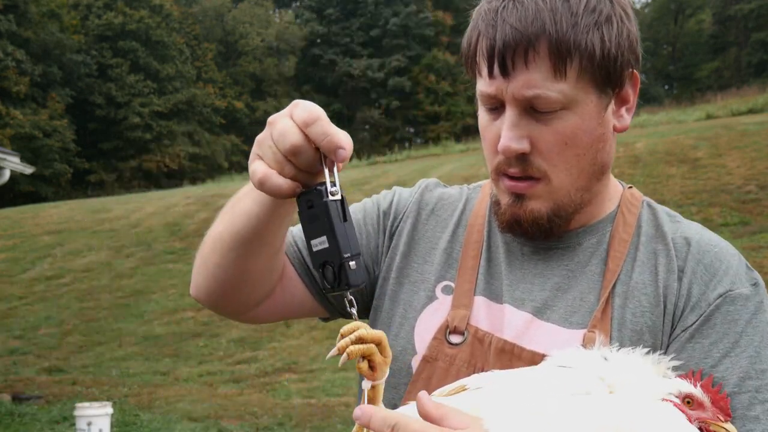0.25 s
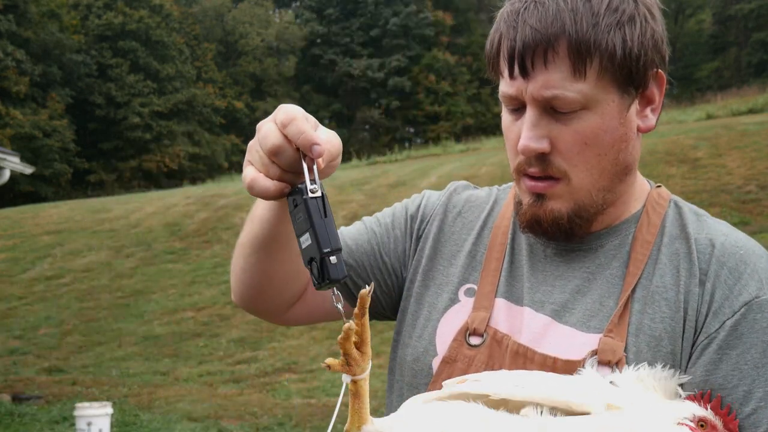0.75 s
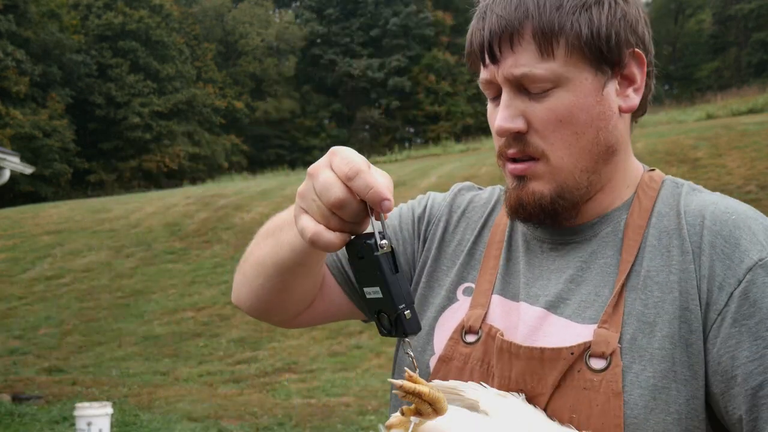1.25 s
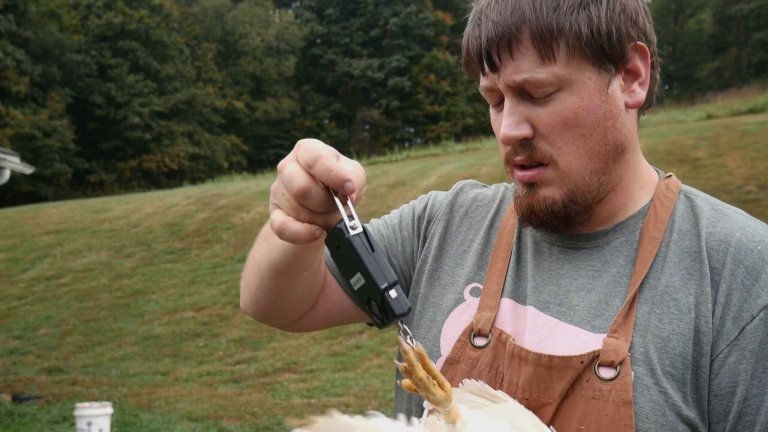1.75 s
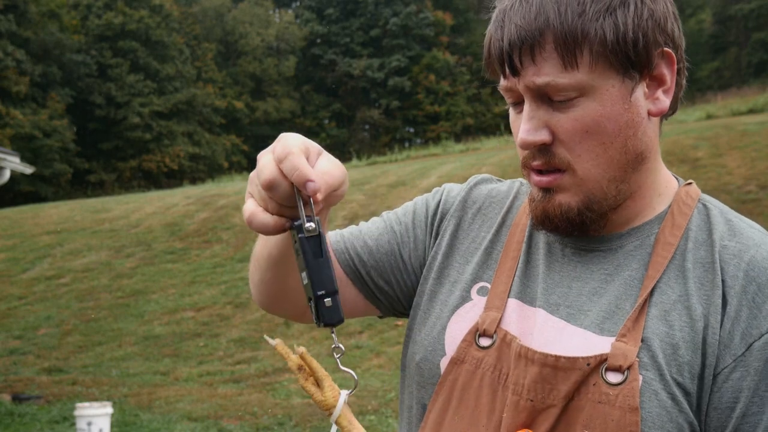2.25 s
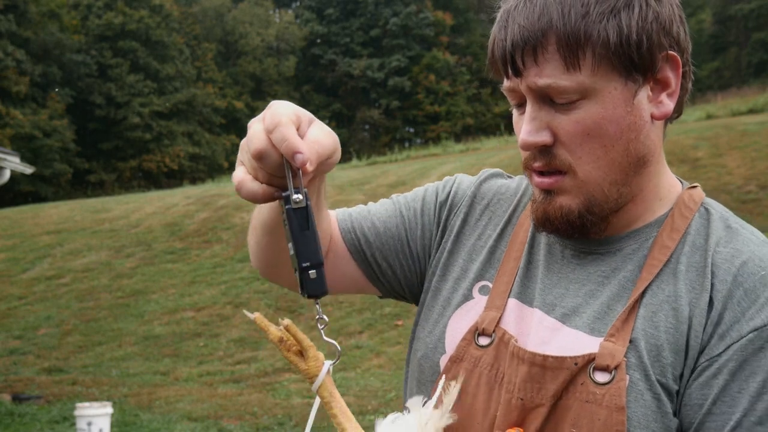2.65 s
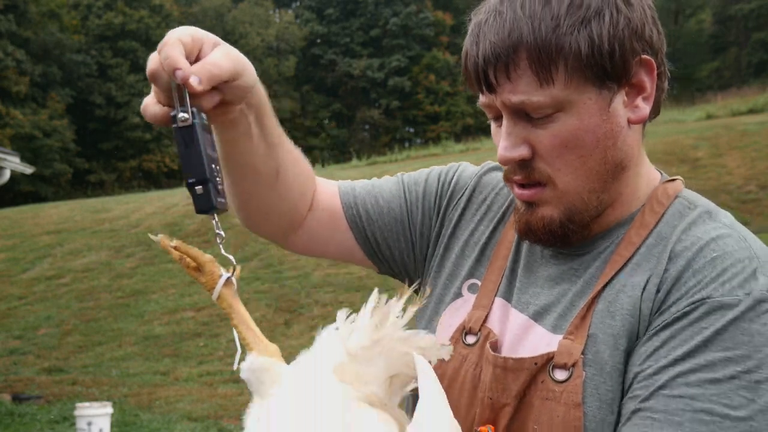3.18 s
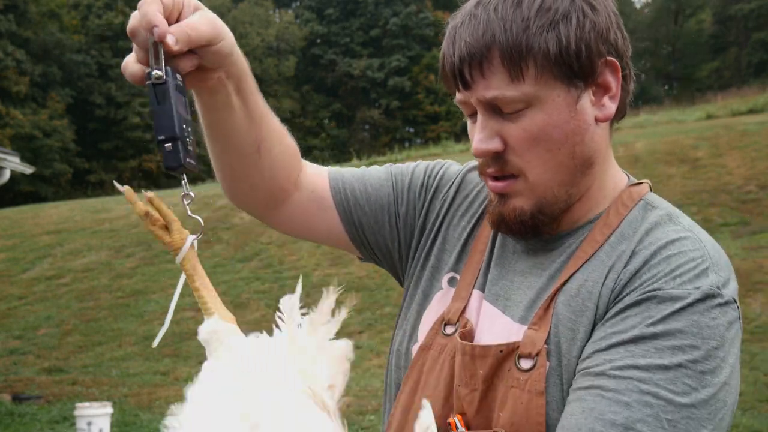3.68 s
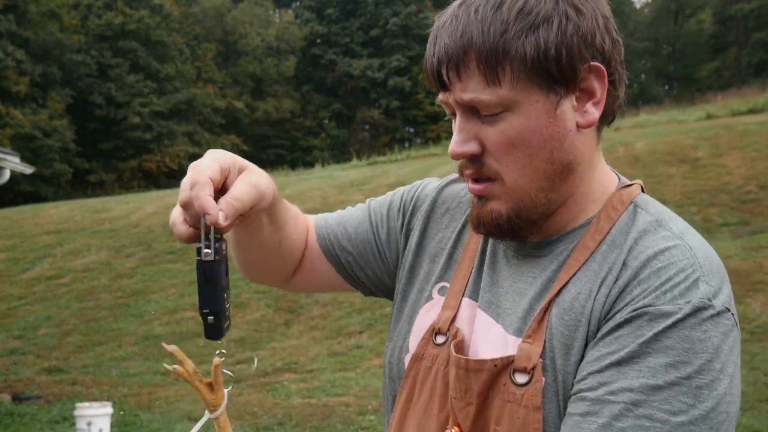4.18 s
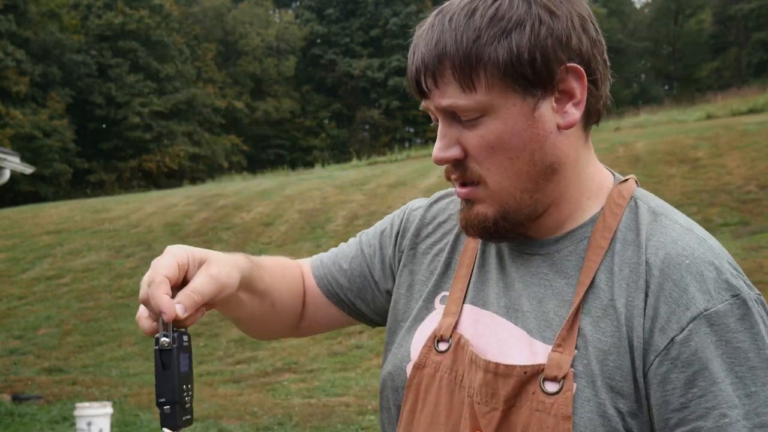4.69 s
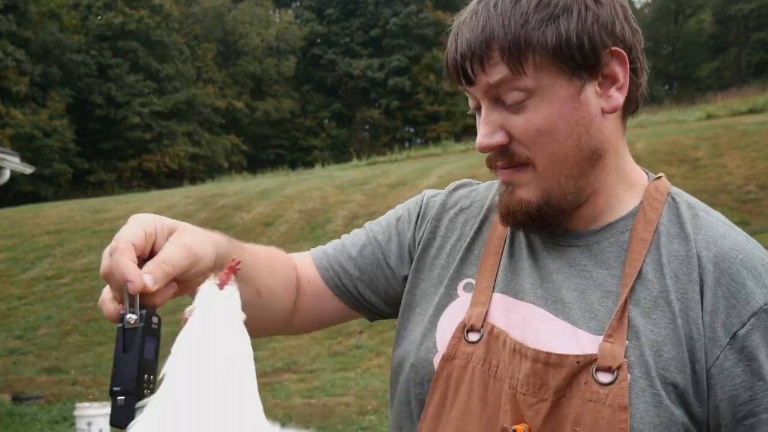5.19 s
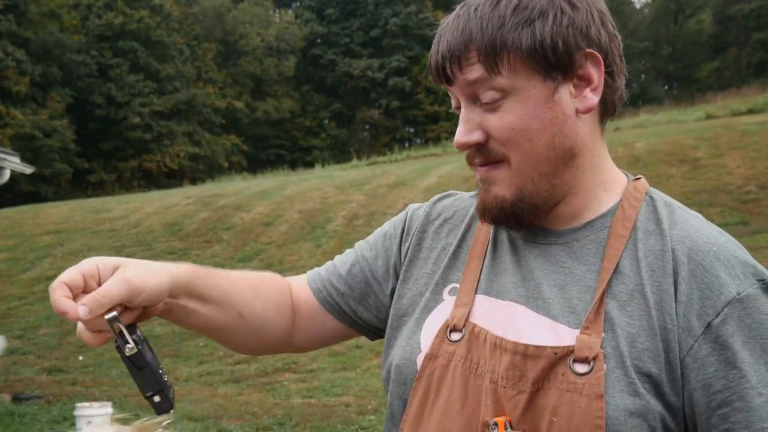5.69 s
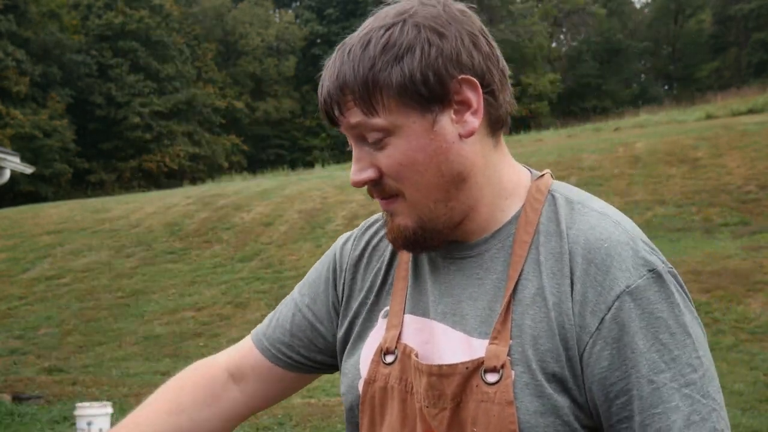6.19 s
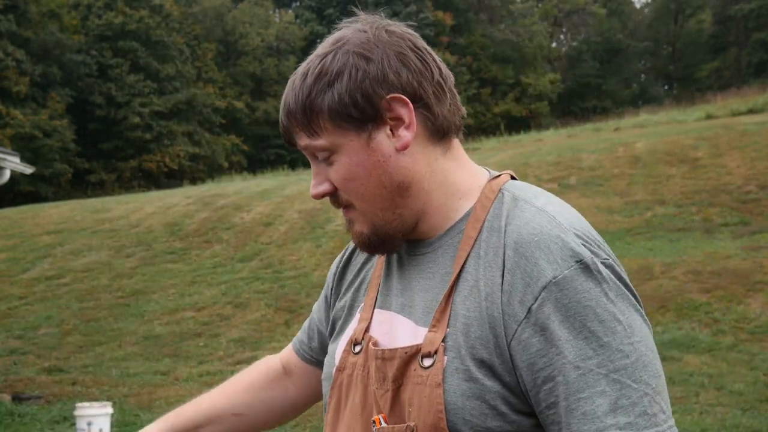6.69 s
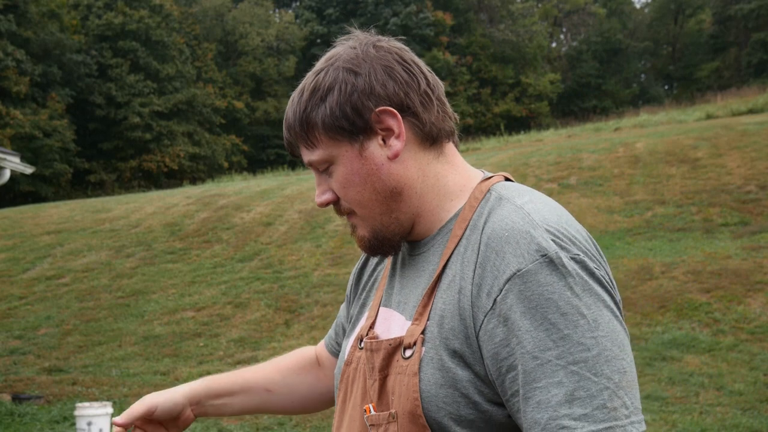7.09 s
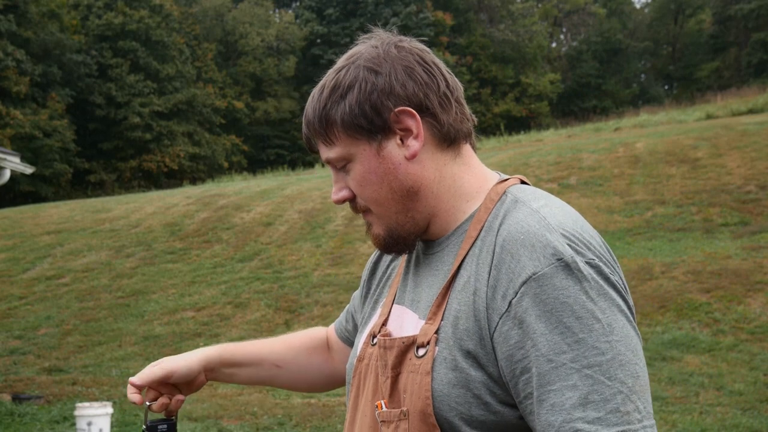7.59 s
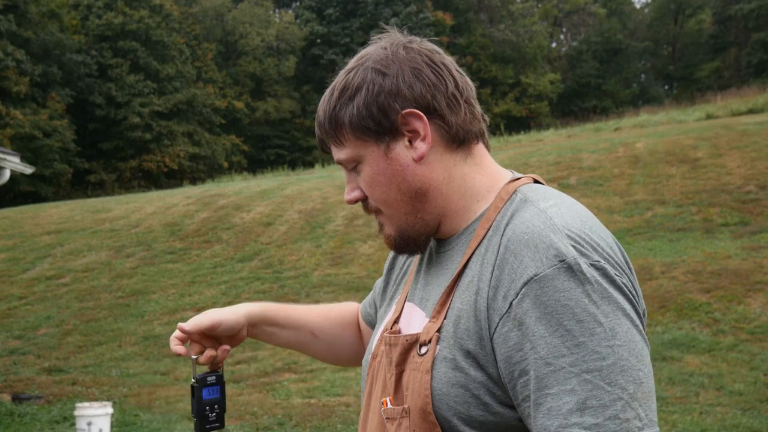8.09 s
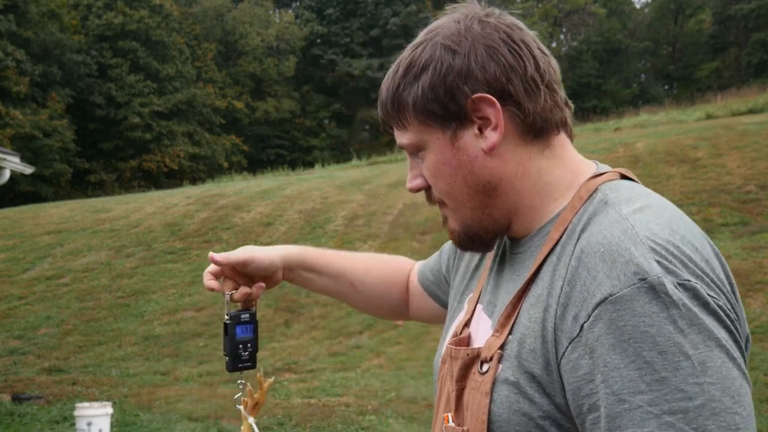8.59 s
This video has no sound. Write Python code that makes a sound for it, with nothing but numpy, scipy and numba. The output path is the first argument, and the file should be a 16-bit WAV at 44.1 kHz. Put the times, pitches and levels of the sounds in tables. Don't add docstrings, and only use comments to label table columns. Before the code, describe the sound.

An open field with high cricket and katydid trills and soft airy hiss, heard through a close, nearly dry microphone. From 0 to 1 second a far bird rasps hoarsely with one tiny gap. At 1.2 a close hen squawks, followed by short cracking squawks at 1.6 and 1.8 and one at 2.3, with feather rustle and sharp ticks around 2. The voice rests from 2.5 to 3.4 with slight rustles. From 3.5 to 4.2 a long squawk rises from hoarse to clear. Between 4.3 and 6 wings beat heavy air thumps, slaps and rustles among four harsh squawks. A falling, breaking squawk comes at 6.2 to 6.6, and a final one at 7 to 7.5. Echo off trees is faint. Small ticks sound near 7.7 and 8.2, while the insects, pushed down by each squawk, gradually swell back until the end.

```python
import sys
import numpy as np
from scipy import signal
from scipy.fft import rfft, irfft
from scipy.io import wavfile
from scipy.ndimage import uniform_filter1d
from numba import njit

SR = 44100
rng = np.random.default_rng(int(sys.argv[2]) if len(sys.argv) > 2 else 0)


def level_to_linear(level):
    exponent = np.asarray(level, float) / 20
    return 10 ** exponent


def output_pcm(signal):
    pcm = np.clip(np.atleast_2d(signal).T, -1, 1) * 32767
    wavfile.write(sys.argv[1], SR, np.round(pcm).astype(np.int16))


N = 390285

# time in seconds, pitch in Hz.
SQUAWKS = [
    [(1.228, 531.6), (1.297, 582), (1.555, 552)],
    [(1.592, 490), (1.619, 487), (1.647, 528), (1.665, 500), (1.69, 461)],
    [(1.82, 505), (1.832, 566), (1.856, 472), (1.864, 552), (1.882, 525), (1.895, 491)],
    [(2.267, 639), (2.38, 641), (2.442, 490.7), (2.465, 420), (2.48, 420)],
    [(3.472, 392), (3.62, 464), (3.72, 513.5), (3.85, 550), (3.95, 588.5), (4.18, 586.2), (4.213, 556),
     (4.228, 462), (4.242, 443)],
    [(4.434, 546.4), (4.526, 593.2), (4.65, 582), (4.68, 551), (4.757, 579.7), (4.79, 497), (4.835, 474.2)],
    [(4.97, 486), (5.002, 505), (5.026, 538.6), (5.034, 534), (5.043, 606), (5.06, 434), (5.08, 450.2)],
    [(5.228, 591.8), (5.34, 602.3), (5.367, 553.4), (5.412, 533), (5.422, 588.5), (5.455, 508)],
    [(5.687, 478.4), (5.76, 452.5), (5.845, 465.5)],
    [(6.221, 603), (6.29, 696), (6.33, 668), (6.38, 578), (6.44, 525.6), (6.48, 551), (6.53, 508.4),
     (6.56, 449.5), (6.605, 399.5)],
    [(7.03, 624), (7.184, 552.8), (7.3, 564), (7.39, 566.6), (7.428, 539.4), (7.438, 588), (7.49, 558),
     (7.515, 542)],
]
WHEEZE_HZ = 1423


def rms_one(x):
    return x / np.sqrt(np.mean(x ** 2) + 1e-20)


def in_time(tables):
    s, *columns = np.transpose(np.concatenate(tables))
    return [np.interp(np.arange(N) / SR, s, c) for c in columns]


def while_sounding(tables, attack_s, release_s):
    gain, t = np.zeros(N), np.arange(N) / SR
    for rows in map(np.array, tables):
        before, after = (rows[0, 0] - t) / attack_s, (t - rows[-1, 0]) / release_s
        beyond = np.maximum(before, after).clip(0)
        gain = np.maximum(gain, level_to_linear(np.interp(t, rows[:, 0], rows[:, 1]) - 60 * beyond))
    return gain


def band(x, low_hz, high_hz, order=2):
    return signal.sosfilt(signal.butter(order, [low_hz, high_hz], "band", fs=SR, output="sos"), x)


def drift(rate):
    r = np.exp(-2 * np.pi * rate / SR)
    return rms_one(signal.lfilter([1], [1, -2 * r, r * r], rng.standard_normal(N + SR))[SR:])


@njit
def resonate(x, cosine, r):
    y = np.zeros(len(x))
    for i in range(2, len(x)):
        y[i] = (1 - r * r) / 2 * (x[i] - x[i - 2]) + 2 * r * cosine[i] * y[i - 1] - r * r * y[i - 2]
    return y


def resonance(x, hz, width_hz):
    return resonate(x, np.cos(2 * np.pi * hz / SR) * np.ones(N), np.exp(-np.pi * width_hz / SR))


def evened(x, window_s):
    return x / np.sqrt(uniform_filter1d(x ** 2, int(window_s * SR)) + 1e-12)


def field():
    # frequency in Hz, level in dB per Hz.
    hiss_colour = [(15, -78), (25, -20), (92, -10.5), (229, -16), (263, -12.5), (293, -18.5), (962, -19.5),
                   (2610, -21.5), (4870, -22.5), (5280, -18), (6050, -19.5), (7110, -6.5), (8360, -26),
                   (14000, -21.5), (16000, -32)]
    # pitch in Hz, width in Hz, level in dB, chirps per second,
    # first chirp in seconds, share of the time sounding, pulses per second.
    insects = [
        (5280, 170, -73, 2.9, 0.042, 0.93, 30),
        (7800, 700, -66, 4, .15, .3, 52),
        (1410, 110, -70, .335, -0.1, .47, .05),
    ]
    colour_hz, colour_db = np.array(hiss_colour).T
    bins_hz = np.fft.rfftfreq(N, 1 / SR).clip(1)
    colour = level_to_linear(np.interp(np.log(bins_hz), np.log(colour_hz), colour_db))
    mid, side = irfft(rfft(rng.standard_normal((2, N))) * colour, N)
    wide_hiss = mid + 0.17 * signal.lfilter([1, -.8], [1], side) * [[1], [-1]]
    out = level_to_linear(-56 + 1.0 * drift(4.2)) * rms_one(wide_hiss)
    t = np.arange(N) / SR
    for hz, width, db, chirps, first_s, share, pulses in insects:
        sounding = (t - first_s) * chirps % 1 < share
        throb = 1 + np.cos(2 * np.pi * pulses * t)
        gate = uniform_filter1d(1. * sounding, 400) * throb
        song = resonance(resonance(rng.standard_normal(N), hz, width), hz, width)
        out = out + level_to_linear(db) * gate * rms_one(song)
    return out


def ducking(loud, knee_db, slope, release_db_s):
    t = np.arange(N) / SR
    level_db = 10 * np.log10(uniform_filter1d(loud ** 2, 900) + 1e-9)
    held_db = np.maximum.accumulate(level_db + release_db_s * t) - release_db_s * t
    return level_to_linear(-slope * (held_db - knee_db).clip(0))


def far_bird():
    # time in seconds, level in dB.
    rasp_level = [
        (0, -42.5),
        (.39, -42),
        (.43, -37),
        (.45, -42),
        (.47, -59),
        (.5, -43.5),
        (.9, -42),
        (.94, -41),
        (.99, -72),
    ]
    # frequency in Hz, width in Hz, level in dB.
    throat_modes = [(420, 102, -9), (624, 35, -2.5), (798, 60, -1), (1190, 106, -6), (1350, 350, -10)]
    air = rng.standard_normal(N) * level_to_linear(0.43 * drift(27))
    rasp = sum((-1) ** k * level_to_linear(db) * resonance(air, hz, width)
               for k, (hz, width, db) in enumerate(throat_modes))
    return rms_one(band(rasp, 190, 1080)) * while_sounding([rasp_level], attack_s=.3, release_s=.3)


def echoes(x):
    t = np.arange(SR) / SR
    near = level_to_linear(-26.5 - 60 * t / 0.11) * (t > .004)
    far = level_to_linear(-83 - 60 * t / 1.3) * np.clip(t / 2.0, 0, 1)
    far = far + level_to_linear(-83.5) * np.exp(-((t - .6) / 0.63) ** 2)
    scatter = rng.standard_normal((2, SR)) * near
    trees = band(rng.standard_normal((2, SR)), 900, 3000) * far
    tails = signal.sosfilt(signal.butter(1, 2000, fs=SR, output="sos"), scatter + trees)
    tails = tails[0] + 0.033 * tails[1] * [[1], [-1]]
    return signal.fftconvolve(x[None], tails, axes=1)[:, :N]


def beating():
    # time in seconds, level in dB.
    struggle = [(1.0, -64), (1.45, -46.5), (2.15, -53.5), (2.46, -49), (2.54, -75.5), (3.4, -46.5),
                (4.0, -64), (4.2, -49.5), (4.29, -75), (4.33, -39.5), (5.0, -43.5), (5.9, -47),
                (6.1, -47.5), (6.55, -52.5), (6.67, -58.5), (7.05, -48), (7.63, -69), (8.6, -68)]
    # time in seconds, air thump in dB, body noise in dB, feather rustle in dB.
    beats = [(1.15, -66, -54.5, -47), (1.4, -66, -54.5, -37), (1.55, -66, -48, -38),
             (3.078, -65, -52.5, -43.5), (6.119, -46, -51, -56), (6.86, -52, -48, -58),
             (7.58, -60, -61, -71), (1.457, -66, -43, -34.5), (1.7, -60, -33, -55),
             (1.754, -33, -39, -41.5), (2.45, -73, -55, -50), (3.221, -83, -45, -55),
             (3.309, -68, -40, -52), (3.385, -62, -48, -52), (3.44, -67, -53, -42),
             (3.672, -50, -38.5, -32), (3.927, -52, -38.5, -35.5), (4.471, -33, -35.5, -47),
             (4.649, -40, -37.5, -48), (4.986, -29, -31, -38), (5.132, -27.5, -36, -48),
             (5.246, -28, -28, -36), (5.381, -30, -31.5, -48), (5.493, -37, -37.5, -50),
             (5.619, -28.5, -33.5, -48), (5.739, -31, -30, -32), (5.884, -41.5, -39.5, -43),
             (5.969, -43, -51, -53), (6.28, -59, -35.5, -52), (6.548, -70, -57, -38.5),
             (7.03, -49, -49, -53), (7.25, -41, -45, -63), (7.699, -66, -60, -70), (8.199, -70, -63, -71)]
    # level beside the struggle in dB, rise and fall of a beat in dB per second
    between_db = np.array([[-16], [0], [-1.5]])
    rise_db_s, fall_db_s = np.array([[400], [250], [150]]), np.array([[330], [220], [120]])
    t = np.arange(N) / SR
    db = in_time([struggle])[0] + between_db
    for s, *peaks in beats:
        near = slice(int((s - .2) * SR), int((s + .2) * SR))
        away = np.maximum(rise_db_s * (s - t[near]), fall_db_s * (t[near] - s))
        db[:, near] = np.maximum(db[:, near], np.array(peaks)[:, None] - away)
    return db


def wings():
    thump_db, body_db, rustle_db = beating()
    active = np.interp(np.arange(N) / SR, [1.0, 1.05, 8.55, 8.6], [0, 1, 1, 0])
    air = rng.standard_normal((2, N))
    lumps, flutter = 1.5 * drift(12), 2.2 * drift(30)
    thump = level_to_linear(thump_db + lumps) * rms_one(band(air[0] + 0.012 * air[1] * [[1], [-1]], 25, 183))
    swish = rms_one(band(rng.standard_normal(N), 130, 450))
    swish = swish + level_to_linear(3.5) * rms_one(band(rng.standard_normal(N), 490, 1000, order=1))
    body = level_to_linear(body_db + lumps + flutter) * swish
    grains = rng.standard_normal((2, N)) * level_to_linear(3.3 * drift(93) + flutter)
    rustle = band(grains[0] + 0.042 * grains[1] * [[1], [-1]], 3500, 12000)
    return active * (thump + body + level_to_linear(rustle_db) * rms_one(rustle))


def slaps():
    # time in seconds, peak in dB, dull part in dB.
    hits = [(3.3045, -45, -25), (3.376, -33.5, -17), (4.339, -22, -29), (4.3601, -15, -42),
            (4.654, -13, -34), (4.7467, -17, -42), (4.9084, -22, -29), (4.9466, -14, -40),
            (5.2199, -13, -31), (5.3577, -11, -20), (5.468, -23, -29), (5.9315, -13, -39),
            (6.1884, -35, -14), (6.2395, -17, -26), (2.177, -34.5, -16), (6.868, -33.5, -18),
            (1.603, -24, -42), (7.683, -31, -47), (8.25, -38, -22), (1.8356, -6, -30), (1.9273, -7.5, -59),
            (2.001, -15.5, -60), (2.1037, -15.5, -33), (2.221, -25.5, -21), (2.255, -31, -10),
            (3.4367, -12.5, -32.5), (3.6676, -25, 3), (4.323, -41.5, 4), (4.445, -33.5, 3),
            (4.473, -21.5, -6), (4.4997, -23, -1), (4.5214, -25, 8), (4.6293, -15, -20),
            (4.968, -23, -10.5), (5.122, -10.5, -28), (5.1648, -6.5, -24), (5.18, -14, -24),
            (5.2397, -3, -23), (5.486, -13, -35), (5.5657, -20, -30), (5.5938, -14, -16), (5.6052, -4, -49),
            (5.729, -6.5, -31), (5.7771, -7, -19.5), (5.9116, -8.5, -45), (6.5222, -42, -13),
            (7.0096, -8, -33.5), (7.7066, -21, -34.5), (8.2345, -27, -17)]
    out, t = np.zeros((2, N + 2000)), np.arange(2000) / SR
    noise = rng.standard_normal((len(hits), 2000))
    decay = (np.exp(-t / 0.0019) + .25 * np.exp(-t / 0.014)) * np.minimum(t / 0.0015, 1)
    crack = 0.5 * (abs(t - .001) < .00005)
    for (s, peak_db, low_db), hiss in zip(hits, noise):
        burst = hiss * decay - crack
        parts_db = np.array([[min(low_db, -6) + 29.5], [-8]])
        at = round(s * SR)
        out[:, at:at + 2000] += level_to_linear(peak_db + parts_db) * burst
    dull, bright = out[:, :N]
    return band(dull, 220, 1800, order=1) + band(bright, 3800, 22000, order=1)


def wheeze():
    # start in seconds, length in seconds, level in dB.
    whistles = [
        (1.215, 0.074, -24),
        (3.4, 0.14, -43),
        (4.421, 0.036, -26),
        (5.085, 0.11, -35),
        (6.551, 0.064, -23.5),
        (6.602, 0.077, -46),
        (1.901, 0.053, -42),
        (2.129, 0.011, -47),
    ]
    t = np.arange(N) / SR
    gain = sum(level_to_linear(db) * np.sin(np.pi * ((t - s) / length).clip(0, 1)) for s, length, db in whistles)
    return gain * rms_one(resonance(resonance(rng.standard_normal(N), WHEEZE_HZ, 150), WHEEZE_HZ, 70))


def register():
    # start in seconds, length in seconds, hoarseness from 0 to 1.
    spells = [(1.605, .025, .3), (1.63, .07, .1), (1.8, .063, .33), (1.863, .06, .08), (2.2, .19, .55),
              (2.39, .045, .3), (2.435, .015, .15), (2.45, .1, .08), (3.615, .05, .35), (3.665, .04, .14),
              (3.706, .089, .03), (3.847, .148, .04), (4.033, .085, .02), (4.118, .082, .05),
              (4.2, .08, .14), (4.642, .108, .03), (4.75, .03, .55), (4.78, .1, .28), (5.005, .035, .07),
              (5.04, .05, .15), (5.2, .165, .6), (5.365, .05, .04), (5.415, .08, .12), (5.8, .1, .55),
              (6.2, .08, .36), (6.28, .06, .26), (6.34, .088, .4), (6.428, .024, .1), (6.452, .068, .45),
              (6.52, .02, .15), (6.54, .03, .3), (6.57, .06, .16), (7.298, .127, .04), (7.385, .01, .17),
              (7.425, .07, .07), (7.495, .04, .4)]
    hoarse = np.full(N, .72)
    for s, length, value in spells:
        hoarse[int(s * SR):int((s + length) * SR)] = value
    return uniform_filter1d(hoarse, 200)


def warble():
    # time in seconds, half width in seconds, share of pitch change, share of windpipe change.
    jolts = [(4.146, .02, 0.0476, -0.065), (4.17, 0.0065, .02, -0.41), (4.6, .013, .07, -0.38),
             (4.212, 0.0086, 0.02, -0.18), (7.441, 0.017, .04, -0.05), (5, .03, 0.01, -0.31),
             (6.585, 0.048, 0.01, -.2), (2.472, 0.018, 0.01, -0.38), (1.6, .014, 0.013, -0.26),
             (7.47, .03, 0.01, -.1), (7.51, 0.022, -0.061, 0.21), (7.07, 0.065, 0.01, -0.083),
             (4.8, .03, 0.01, -0.12)]
    t = np.arange(N) / SR
    return np.exp(sum(np.array(shares)[:, None] * (1 - abs(t - s) / width).clip(0)
                      for s, width, *shares in jolts))


def syrinx(pitch_hz, hoarse, wander, scatter, shimmer_db):
    chance, at, times = rng.standard_normal((N // 40, 3)).clip(-2, 2), 64., []
    while at < N - 64:
        times.append(at)
        now = int(at)
        at += SR / pitch_hz[now] * np.exp(wander * hoarse[now] ** 2 * chance[len(times), 0])
    times, chance = np.array(times), chance[:len(times)]
    now = times.astype(int)
    times = times + scatter * hoarse[now] * chance[:, 2] * SR / pitch_hz[now]
    sizes = level_to_linear(shimmer_db * hoarse[now] * chance[:, 1])
    taps = times.astype(int)[:, None] + np.arange(-7, 9)
    pulses = np.zeros(N)
    np.add.at(pulses, taps, sizes[:, None] * np.sinc(taps - times[:, None]) * np.hanning(18)[1:-1])
    return pulses


def throat_shape(pitch_hz, hoarse):
    # beak opening in dB, chest tone in dB, time to open in seconds, time to close in seconds.
    gapes = [(-4, 0.5, 0.15, 0.016), (-8.5, -8.5, 0.015, 0.025), (-11.5, -10, 0.015, 0.036),
             (-2, -8.5, 0.012, 0.034), (-2, -13.5, .13, 0.068), (-3, -8.5, 0.038, 0.074),
             (-11.5, -11.5, 0.028, 0.054), (-2, -5.5, 0.013, 0.06), (-1, -21, 0.04, 0.037),
             (-1.5, -5.5, 0.021, 0.055), (2, -2.5, 0.068, 0.082)]
    # windpipe in Hz early, late, beak cavity in Hz early, late.
    cavities = [(1300, 880, 2150, 1800), (1500, 1020, 2900, 2500), (1580, 1380, 1800, 2300),
                (1200, 1190, 1950, 1860), (1203, 1410, 2240, 2240), (1490, 1450, 2408, 2110),
                (1413, 1490, 2090, 2000), (1454, 1370, 2400, 2150), (1340, 1150, 2230, 1400),
                (1353, 1360, 2110, 1960), (1330, 1290, 2200, 2250)]
    parting, held, shut = (.92, 21, 5.9), (1, 0, 0), (0.92, 19.8, 17)
    rows = []
    for call, gape, cavity in zip(SQUAWKS, gapes, cavities):
        open_db, chest_db, open_s, close_s = gape
        pipe, pipe_late, beak, beak_late = cavity
        start, (end, last_hz) = call[0][0], call[-1]
        parted = min(start + open_s, end - close_s - .002)
        stages = ((start - .02, parting, 1, pipe, beak),
                  (parted, held, 1, pipe, beak),
                  (end - close_s, held, 1, pipe_late, beak_late),
                  (end + 0.0011, shut, 0, 2 * last_hz, beak_late))
        for s, (share, open_loss, chest_loss), wide, pipe_hz, beak_hz in stages:
            rows.append((s, pipe_hz, beak_hz * share, open_db - open_loss,
                         chest_db - chest_loss, open_loss, wide))
    pipe_hz, beak_hz, open_db, chest_db, lost_db, wide = in_time([rows])
    clear = uniform_filter1d((1 - hoarse / 0.3).clip(0), 600) * wide
    pipe_hz = pipe_hz + 0.47 * clear * (3 * pitch_hz - pipe_hz)
    beak_hz = beak_hz + clear * (4 * pitch_hz - beak_hz)
    return pipe_hz, beak_hz, open_db - 8 * clear, chest_db, lost_db


def accents():
    # time in seconds, level in dB, half width in seconds, beak opening in dB, chest tone in dB.
    pushes = [(3.6, -1, .06, 1.5, -4), (7.07, 1, .05, 1, -7.5), (7.33, 0, .04, 6, 2),
              (3.95, 1.5, 0.073, 0.6, 5), (1.9, 3, .012, -1, -3), (1.888, 3, 0.0088, 4, -2),
              (2.9, -1, .02, 4, 6), (7.5, -0.5, .03, 4, -0.5), (3.76, 0, .05, -1, 4),
              (4.8, 0, 0.045, 11, -11), (4.9, -1.5, 0.043, 5.5, -2), (8.1, 0, .04, -1, 2),
              (1.48, 0.5, 0.026, -1, -1), (1.701, -4, 0.039, -21.5, 7), (2.475, 3.5, 0.054, -9, 10),
              (3.931, 0, 0.12, 19.5, 23.5), (4.069, 1, 0.03, -3, -6), (4.3, -9, 0.04, 1, 0),
              (5.041, 6.5, 0.03, 14, -4), (3.7, 2, 0.021, -5, -3.5), (4.527, 3, 0.022, 7, 11),
              (4.72, -16.5, 0.0076, 5, 16), (6.337, 0.5, .015, 7.5, -8.5), (1.342, 1.5, 0.011, -3, 8),
              (1.3, -3.5, 0.011, 1, -4), (6.44, 1, 0.0074, 15.5, -1.5), (6.527, 15.5, 0.0093, -9, -7.5),
              (6.59, -1.5, 0.088, 9, -30), (6.27, -5.5, 0.071, -0.5, -10.5), (3.82, -2, 0.035, 3, 8.5),
              (5.0, 5.5, 0.01, 10, -6), (7.4, 2, 0.076, 0, -0.5), (7.439, 9.5, 0.012, -17, -16)]
    out = np.zeros((3, N))
    for s, db, width, *colour_db in pushes:
        near = np.arange(int((s - width) * SR), int((s + width) * SR))
        out[:, near] += np.array([db, *colour_db])[:, None] * (1 - abs(near / SR - s) / width).clip(0)
    return out


def per_squawk(rows):
    return in_time([[(call[0][0] - .03, *row), (call[-1][0] + .03, *row)]
                    for call, row in zip(SQUAWKS, rows)])


def breath():
    # onset in dB, swell in seconds, level once swollen in dB, level before the fade in dB,
    # fade in seconds.
    effort = [(-43.5, 0.024, -19, -16, 0.014), (-26.5, 0.024, -12.5, -17, 0.028),
              (-19, 0.049, -11.5, -13.5, 0.014), (-15, .04, -16.5, -18.5, 0.0132),
              (-17, 0.066, -15.5, -15, 0.048), (-32, 0.096, -16, -16, 0.013),
              (-26.5, 0.02796, -15.5, -18.5, 0.032), (-22.5, 0.12, -16.5, -15.5, 0.0046),
              (-24, 0.089, -28, -16.5, 0.0092), (-24.5, 0.24, -18, -20, 0.015),
              (-32, 0.16, -19, -15.5, 0.063)]
    shapes = []
    for call, (onset_db, swell_s, full_db, late_db, fade_s) in zip(SQUAWKS, effort):
        start, end = call[0][0], call[-1][0]
        shapes.append([(start, onset_db), (start + swell_s, full_db),
                       (end - fade_s, late_db), (end, late_db - 9)])
    return while_sounding(shapes, attack_s=0.021, release_s=0.03)


def upper_throat(source, nasal_db, treble_db, dulling_db):
    # frequency in Hz, width in Hz, level in dB.
    modes = [(2670, 870, 13), (3940, 900, 9.5), (5390, 1200, 2), (6220, 780, -3.5), (7840, 970, -4),
             (11700, 4500, -20)]
    out = 0
    for k, (hz, width, db) in enumerate(modes):
        tilt_db = treble_db if hz > 7000 else nasal_db if hz > 5000 else 0
        flicker_db = 5.5 * min(k / 2, 1) * drift(8.9)
        dull_db = 0.27 * dulling_db * np.log2(hz / 2685)
        mode = resonance(resonance(source, hz, 2 * width), hz, width)
        out = out + (-1) ** k * level_to_linear(db + tilt_db + flicker_db - dull_db) * mode
    return out


def hen():
    # mouth mode in Hz, its level in dB early, late, upper modes in dB.
    mouths = [(2640, -7.5, -23.5, 3), (2950, -10, -4.5, 1.5), (2940, -15.5, -9.1, 8.5), (3140, -7, -14, 4),
              (2620, -4.5, -8, 1.2), (2864, -3, -15, 6), (2670, -9, -10, -1.5), (2834, -29, -23.5, 3),
              (2670, 2, -16, -5), (2610, -2, -12.5, 1.5), (2600, -6.5, -12, 3)]
    # share the side cavity swallows, nasal modes in dB, treble in dB.
    tops = [(1, -1.3, -2.5), (1, 1.5, 0.3), (.9, -6, 4), (0.83, -9.5, 8), (0.69, 5.5, -2.5),
            (0.34, -5.2, 1), (0.13, -1, 1), (0.24, 5, 5), (0.88, -7, -4), (0.36, 6, 8), (0.85, 6, 9)]
    # frequency in Hz, width in Hz.
    dark_bands = [(4550, 340), (6850, 240), (8900, 500)]
    bend, squeeze = warble()
    hoarse, effort_hz = register(), in_time(SQUAWKS)[0] * bend
    pipe_hz, beak_hz, open_db, chest_db, lost_db = throat_shape(effort_hz, hoarse)
    push_db, gape_db, depth_db = accents()
    pipe_hz = pipe_hz * squeeze
    open_db = open_db + gape_db
    chest_db = chest_db + depth_db + 8 * hoarse * (drift(28) - .6)
    pitch_hz = effort_hz * np.exp((.12 * np.minimum(hoarse, .25) + .002) * drift(30))
    mouth_hz, mouth_db, upper_db = in_time([[(call[0][0], hz, early, up), (call[-1][0], hz, late, up)]
                                            for call, (hz, early, late, up) in zip(SQUAWKS, mouths)])
    swallowed, nasal_db, treble_db = per_squawk(tops)
    swallowed = swallowed.clip(0, 1)

    source = rms_one(syrinx(pitch_hz, hoarse, wander=.17, scatter=.12, shimmer_db=5))
    source = source + (.4 * hoarse ** 2 + .02) * rng.standard_normal(N)
    source = source * level_to_linear(2.8 * hoarse * drift(60))

    chest_hz = pitch_hz * np.exp(.11 * hoarse ** 2 * drift(35))
    chest = evened(resonance(resonance(source, chest_hz, 185), pitch_hz, 400), .08)
    sway = np.exp(.07 * hoarse * drift(25))
    pipe = evened(resonance(resonance(source, pipe_hz, 1500), pipe_hz * sway, 280), 0.025)
    beak = evened(resonance(resonance(source, beak_hz, 1650), beak_hz / sway, 140), 0.15)
    upper = upper_throat(source, nasal_db, treble_db, lost_db - gape_db.clip(0))
    upper = level_to_linear(upper_db - 9.0 + 0.36 * open_db) * evened(upper, 0.3)
    mouth = evened(resonance(resonance(source, mouth_hz, 900), mouth_hz * sway, 180), 0.09)
    mouth = level_to_linear(mouth_db + 0.7 * open_db + 4.0 * drift(20)) * mouth

    voice = pipe - level_to_linear(chest_db) * chest - level_to_linear(open_db) * beak + upper + mouth
    for hz, width in ((4600, 510), (4080, 550)):
        voice = voice - swallowed * resonance(voice, hz, width)
    for hz, width in dark_bands:
        voice = voice - resonance(voice, hz * np.exp(.04 * drift(2.5)), width)
    voice = voice + 1.4 * hoarse * resonance(voice, WHEEZE_HZ, 80)
    return evened(voice, 0.038) * breath() * level_to_linear(push_db)


def scene():
    voice = hen()
    near = voice + wings() + slaps() + far_bird() + wheeze()
    gain = ducking(voice, knee_db=-36, slope=.33, release_db_s=13)
    return near + echoes(voice) + field() * level_to_linear(7.5) * gain


def top_cut(x):
    return signal.sosfilt(signal.butter(12, 16800, fs=SR, output="sos"), x)


def record(dry):
    chance, k = rng.standard_normal((2, 400)), np.arange(400)
    treble = signal.lfilter([1, -2, 1], [1], chance[1] * level_to_linear(-k / 11.0))
    colour = level_to_linear(-55.5 - k / 4.4) * chance[0] + level_to_linear(-42) * treble
    side = signal.fftconvolve(dry.mean(0), colour)[:N]
    ports = 1.2 * np.tanh((dry + side * [[1], [-1]]) / 1.2)
    mix = signal.sosfilt(signal.cheby2(10, 60, 16700, fs=SR, output="sos"), ports)
    return top_cut(mix)


dry = scene()
out = record(dry)
output_pcm(out)
```